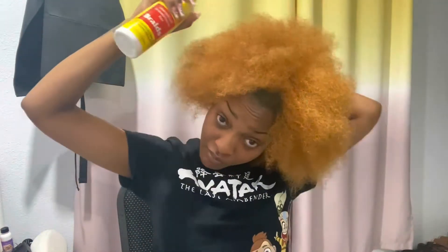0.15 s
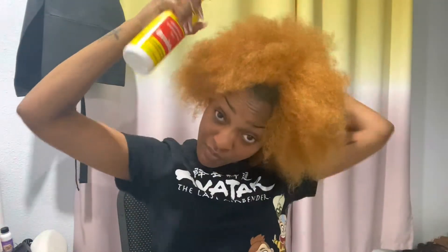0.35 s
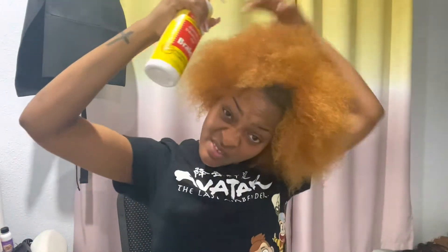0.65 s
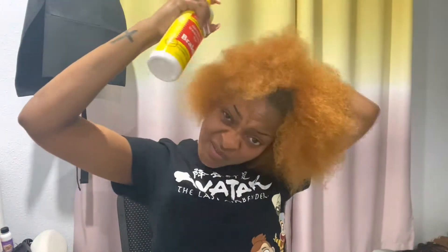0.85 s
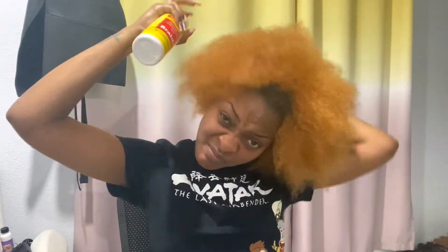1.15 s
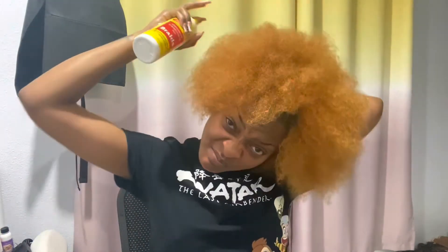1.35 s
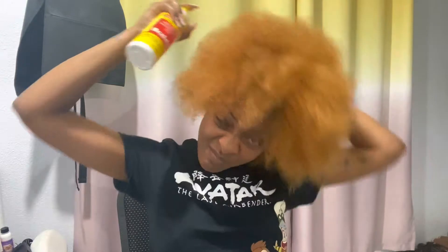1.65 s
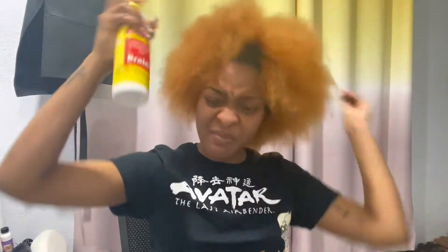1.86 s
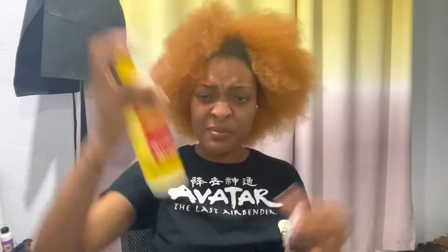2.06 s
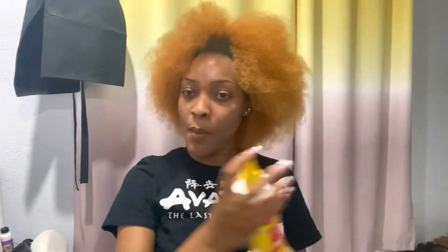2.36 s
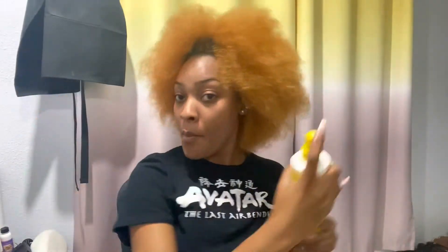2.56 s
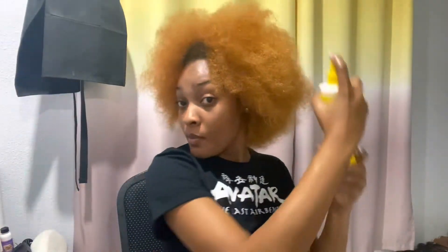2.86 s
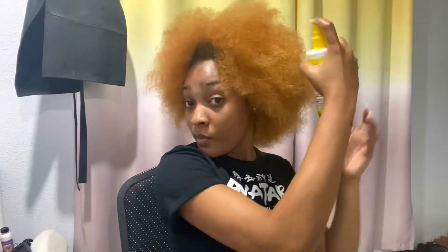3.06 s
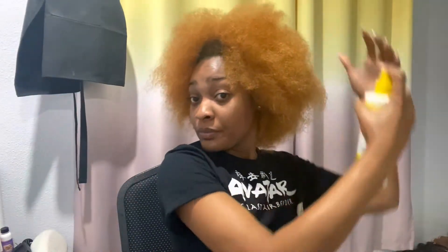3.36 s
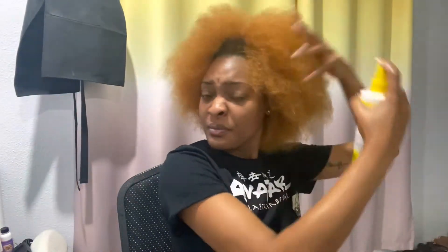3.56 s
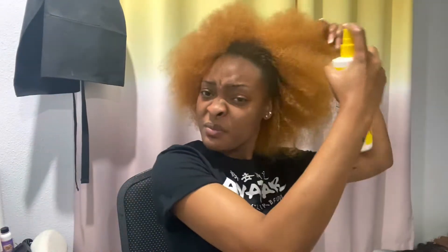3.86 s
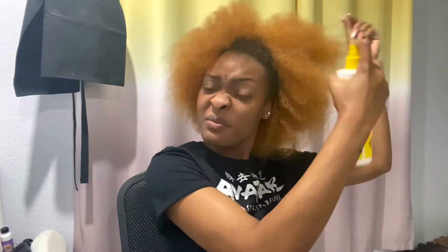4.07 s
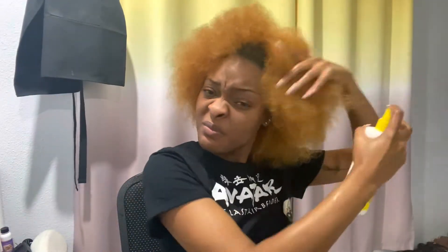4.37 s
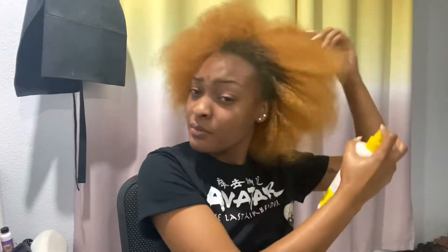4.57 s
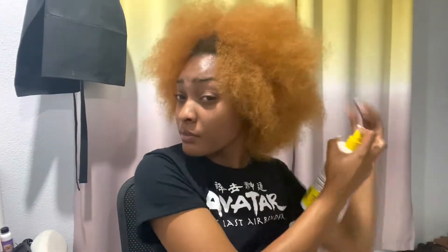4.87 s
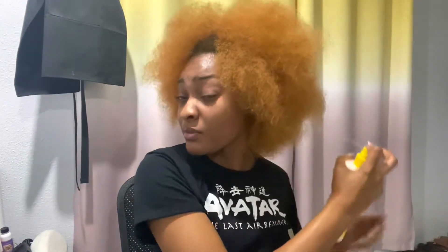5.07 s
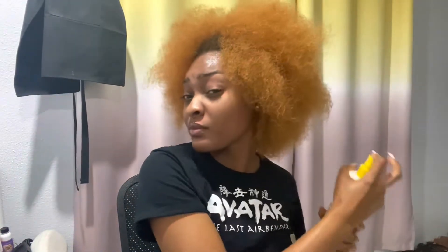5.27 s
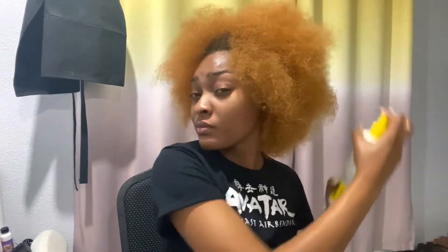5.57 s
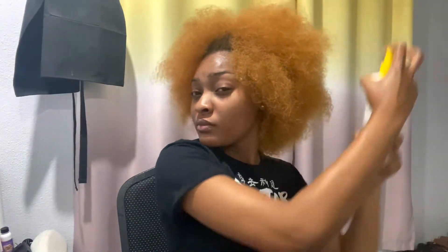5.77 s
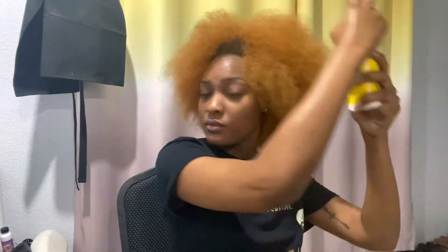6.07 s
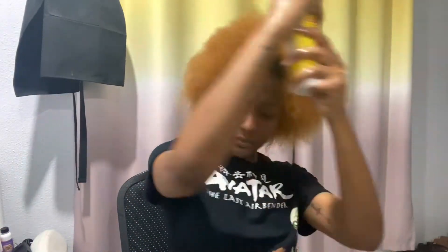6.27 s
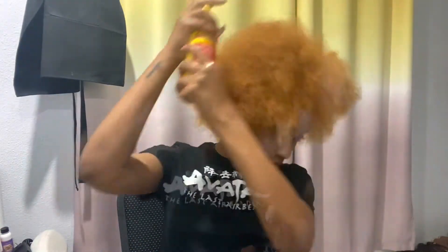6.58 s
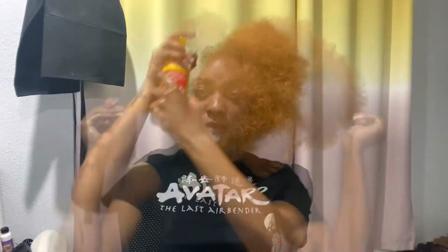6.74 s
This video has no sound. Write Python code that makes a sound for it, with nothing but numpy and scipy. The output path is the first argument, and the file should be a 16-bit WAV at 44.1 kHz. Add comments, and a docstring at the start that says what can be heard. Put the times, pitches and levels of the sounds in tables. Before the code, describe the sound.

Close in a small, bare, lightly echoing room, a plastic finger-pump bottle puffs short bright mists onto hair, about three and a half a second. After six or seven it stops while hands rub and tap the plastic, then resumes evenly with much harder clacks at the end of each press. Low hum and rumble rise underneath in the second half. The stereo microphone hears it mostly on the left.

```python
"""Finger-pump mist bottle

A plastic bottle mists hair, three to four squirts a second, in a small bare room; midway it changes hands.
Presses are shaped noise ending in a clack: blows ringing plastic resonances over a low sine knock.
Taps, rubs and bumps of the hands are struck resonances and coloured noise. Mostly on the left.
Mains hum (sines) and low rumble (noise) come up in the second half, under faint room hiss."""
import sys
import numpy as np
from scipy import signal
from scipy.fft import rfft, irfft
from scipy.io import wavfile

SR = 44100
rng = np.random.default_rng(int(sys.argv[2]) if len(sys.argv) > 2 else 0)


def transcribe(signal):
    """Save signal, clipped to [-1, 1], as a 16-bit WAV file at the path in sys.argv[1]."""
    frames = np.atleast_2d(signal).T
    limited = np.clip(frames, -1, 1)
    pcm = np.round(limited * 32767).astype(np.int16)
    wavfile.write(sys.argv[1], SR, pcm)


N = 304731
TIME_S = np.arange(N) / SR
HZ = np.fft.rfftfreq(4096, 1 / SR)

# All table levels are relative.
# Pump presses: (start [s], mist level [dB])
PRESSES = [(-.03, -49.5), (0.266, -52), (0.545, -46.5), (.821, -46), (1.105, -48), (1.397, -47),
           (1.695, -46), (3.035, -46), (3.318, -46), (3.601, -46.5), (3.874, -46), (4.146, -47),
           (4.417, -45), (4.688, -46), (4.969, -46.5), (5.264, -48.5), (5.567, -47.5), (5.835, -46.5),
           (6.13, -48), (6.441, -49.5), (6.723, -53)]
# Nozzle hiss spectrum: (frequency [Hz], level [dB])
MIST_SPECTRUM = [(300, -56), (800, -8.5), (1500, -5.5), (2300, -3), (3000, -1.5), (4200, -0.5), (5200, -2),
                 (6500, 0.5), (7500, 0.5), (8400, -4), (9200, -9.5), (10200, -21), (10800, -35.5),
                 (13000, -102)]
# Nozzle turning away round the head: (time [s], brightness [dB/octave])
NOZZLE_AIM = [(0, 3), (3.1, 1.8), (4.1, 0.9), (6.9, 0.5)]
# Plunger stops: (time [s], level [dB], body knock [Hz], cap pitch [Hz], cap ring [dB])
PLUNGER_STOPS = [(0.0977, -37, 1020, 3870, 16.5), (0.3668, -52.5, 935, 3900, 8),
                 (0.9285, -51, 930, 3960, 1), (1.517, -31, 980, 3020, -8), (1.8077, -27.3, 880, 4240, 12.5),
                 (3.1604, -32.5, 890, 4070, 9), (3.7133, -22.5, 1300, 4800, 9.5),
                 (4.0025, -23.5, 750, 4300, 10), (4.2598, -25, 734, 4370, 14),
                 (4.8144, -19.5, 1015, 4040, 4), (5.078, -19.5, 1220, 3230, 3),
                 (5.383, -20.5, 700, 3600, 3.5), (5.661, -23.5, 837, 3250, 8), (5.9527, -20, 840, 4450, 4),
                 (6.2484, -22, 873, 4100, 9), (6.5408, -20, 850, 3760, 3.5), (6.8538, -30, 880, 4000, 9)]
# Bare plastic click spectrum: (frequency [Hz], level [dB])
PLASTIC_SPECTRUM = [(200, -13.5), (500, -5), (1400, 5.5), (2200, -13.5), (3200, 3.5), (5000, 1), (5800, -5),
                    (6500, -3), (7400, -12), (8600, -11), (9400, -21), (10200, -21), (11000, -78),
                    (13000, -54)]
# Shell resonance, tuned and damped by the sliding grip: (time [s], pitch [Hz], ring [dB])
SHELL_RING = [(0, 2220, 15.5), (1.5, 2150, 6), (3.1, 2320, 17.5), (3.7, 2130, 8.5), (5.4, 2110, 7.5),
              (6, 1820, 12), (6.9, 1980, 12)]
# Finger and nail taps on the bottle: (time [s], level [dB], pitch [Hz])
FINGER_TAPS = [(1.77, -37, 1840), (2.157, -34.5, 3850), (2.188, -41, 1650), (2.251, -29, 2720),
               (2.313, -51, 2870), (2.572, -43.5, 5000), (2.685, -41, 1210), (2.863, -37.5, 1300),
               (5.246, -36, 601), (5.549, -30.5, 2330), (6.4235, -27, 2390)]
# Palm and fingers sliding and squeaking: (start [s], length [s], level [dB], pitch [Hz], ring [dB])
HAND_RUBS = [(0.328, 0.047, -57.5, 1730, 23), (1.197, 0.079, -60, 2280, 17),
             (2.145, 0.13, -55.5, 1820, 11.5), (2.59, 0.11, -67, 2340, 18), (2.661, 0.27, -68, 2830, 26),
             (2.85, 0.1, -65.5, 5050, 18), (2.857, 0.069, -55, 1530, 9), (5.542, .052, -47, 2350, 8.5),
             (6.418, .047, -41.5, 2370, 17)]
# Dull hand bumps about the start of a press: (time [s], level [dB])
HAND_BUMPS = [(4.167, -40), (5.575, -38), (5.836, -42), (6.099, -40.5), (6.43, -37.5)]
# Mains hum partials: (frequency [Hz], level [dB], phase between channels [rad])
HUM_PARTIALS = [(58.6, -0.5, 1.54), (121, 2.5, 2.21)]
# Rumble spectrum: (frequency [Hz], level [dB])
RUMBLE_SPECTRUM = [(22, -42), (42, -4), (60, 1.5), (95, -1.5), (160, -4.5), (280, -4.5), (420, -12.5),
                   (800, -23), (2000, -82)]
# Swell of hum and rumble: (time [s], level [dB])
LOW_SWELL_DB = [(0, -22.5), (1.5, -16.5), (2.7, -16), (4.1, -9), (4.55, 0.5), (5.8, 0), (6.9, -3)]
# Room hiss spectrum: (frequency [Hz], level [dB])
AIR_SPECTRUM = [(200, -24), (600, -1.5), (1500, 3.5), (2300, 7), (3200, -1), (5000, 0.5), (8000, -2),
                (10000, -15.5), (11500, -15), (13500, -25)]
# Room hiss level: (time [s], level [dB])
AIR_LEVEL_DB = [(0, -63), (2.6, -68.5), (3.6, -62.5), (6.3, -64.5), (6.9, -72)]
# Reverberation time: (frequency [Hz], t60 [s])
ROOM_T60 = [(200, 0.89), (600, 0.58), (1400, 0.54), (2400, 0.51), (4200, 0.53), (8000, 0.39), (12000, 0.44)]
# Reverberation colour: (frequency [Hz], level [dB])
TAIL_COLOUR = [(300, 2), (800, -3.5), (1400, -2.5), (2300, 3), (4200, 1), (8000, 1)]
# Wall and ceiling echoes: (delay [s], level [dB])
WALL_ECHOES = [(.0125, -15.5), (0.0205, -24.5), (.0255, -18), (.031, -12), (0.037, -22)]
# Bottle travelling round the head: (time [s], right over left [dB])
BOTTLE_SWING = [(0, 7), (.6, 4.5), (1.5, 1), (3, 0), (4.1, 0), (6.9, 0)]
# Right channel response: (frequency [Hz], gain [dB])
RIGHT_RESPONSE = [(40, 0.5), (120, -9.5), (250, -2.5), (600, -0.5), (1200, -6.5), (2300, -9), (3400, -9),
                  (4600, -15), (6500, -8.5), (7600, -7.5), (8600, -18), (10000, -5)]

STROKE_MAX_S, SHORT_STROKE_S = 0.15, 0.084  # latest stop of a full press; jet length without a stop
OVERRUN_S, OPENING_DB = 0.0077, -8  # jet outlasts the stop; opening level against full flow
REBOUND_S, REBOUND_SPREAD_S, REBOUND_DB = 0.0065, 0.0008, -11.5
THUD_DB, THUD_GROWTH = -20, 0.34  # knock for a 0 dB blow; dB of knock per dB of blow
TAP_RING_DB, RUB_WIDTH_HZ, BUMP_HZ = 22.5, 156, 293
HUM_DB, RUMBLE_DB = -52.5, -51.5
RUMBLE_FOLLOWS = 0.79  # dB per dB of the low swell
AIR_RIGHT_DB = 5.5  # ahead of the right channel response
EDGE_HZ = 13760


def amp(db):
    """Decibels to gain."""
    return 10 ** (np.asarray(db) / 20)


def unit(x):
    """Scale to rms 1."""
    return x / np.sqrt(np.mean(x ** 2) + 1e-20)


def read(points, hz):
    """Interpolate a spectrum along a log-frequency axis."""
    point_hz, value = np.transpose(points)
    return np.interp(np.log(hz + 1), np.log(point_hz + 1), value)


def track(points, time_s):
    """Interpolate a two-column table in time."""
    return np.interp(time_s, *np.transpose(points))


def add(mix, time_s, sound):
    """Mix a sound in at a time, trimming both ends to fit."""
    start = round(time_s * SR)
    sound = sound[max(-start, 0):]
    part = mix[max(start, 0):][:len(sound)]
    part += sound[:len(part)]


def causal(db):
    """Minimum-phase impulse response of a dB curve on HZ."""
    mirrored_db = np.concatenate([db, db[-2:0:-1]])
    log_spectrum = np.conj(signal.hilbert(np.log(amp(mirrored_db))))
    return np.fft.ifft(np.exp(log_spectrum)).real[:len(HZ)]


def noise(db, size):
    """Gaussian noise of rms 1 with a dB curve on HZ."""
    colour = np.interp(np.fft.rfftfreq(size, 1 / SR), HZ, amp(db))
    white = rng.standard_normal(size)
    return unit(irfft(rfft(white) * colour, size))


def noise_pair(spectrum, likeness):
    """Two channels of noise with a given correlation."""
    left = noise(read(spectrum, HZ), N)
    other = noise(read(spectrum, HZ), N)
    return np.array([left, likeness * left + np.sqrt(1 - likeness ** 2) * other])


def wander(knots_per_s, size):
    """Random drift: standard normal knots joined by straight lines."""
    knots = rng.standard_normal(4096)
    return np.interp(np.arange(size) / SR * knots_per_s, np.arange(len(knots)), knots)


def background(hum_waver_db=1.5, rumble_waver_db=3.4, air_waver_db=0.7, drift_rad=0.92):
    """Wavering mains hum and lumpy rumble on one swell, under faint room air."""
    swell_db = track(LOW_SWELL_DB, TIME_S)
    rumble_db = RUMBLE_DB + RUMBLE_FOLLOWS * swell_db + rumble_waver_db * wander(21, N)
    out = amp(rumble_db) * noise_pair(RUMBLE_SPECTRUM, likeness=-0.59)

    air_db = track(AIR_LEVEL_DB, TIME_S) + air_waver_db * wander(20, N)
    channel_gain = amp([[0], [AIR_RIGHT_DB]])
    out += amp(air_db) * channel_gain * noise_pair(AIR_SPECTRUM, likeness=0.05)

    for hz, db, apart_rad in HUM_PARTIALS:
        phase = 2 * np.pi * hz * TIME_S + drift_rad * wander(4.3, N)
        level_db = HUM_DB + swell_db + db + hum_waver_db * wander(16, N)
        out += amp(level_db) * np.sin([phase, phase + apart_rad])
    return out


def jet_length_s(start):
    """Time from a press to just past its stop, or a short stroke if no stop follows soon."""
    for stop, *_ in PLUNGER_STOPS:
        if 0 < stop - start < STROKE_MAX_S:
            return stop - start + OVERRUN_S
    return SHORT_STROKE_S


def squirts(level_db, rise_s=0.015, fall_s=0.0046, sputter_db=1.3):
    """The jet starts abruptly, swells with finger pressure and sputters until the plunger stops."""
    out = np.zeros(N)
    t = np.arange(SR // 4) / SR
    whistle = 2.5 / (1 + ((HZ - 8350) / 300) ** 2)  # octaves' worth of tilt, at 8350 Hz
    octaves = np.log2((HZ + 100) / 5000)
    for start, db in PRESSES:
        pressure = (1 - np.exp(-t / 0.003)) * amp(OPENING_DB * np.exp(-t / rise_s))
        pressure *= np.exp(-np.maximum(t - jet_length_s(start), 0) / fall_s)
        # aimed at the microphone: brighter, with more whistle
        tilt = track(NOZZLE_AIM, start)
        hiss = noise(read(MIST_SPECTRUM, HZ) + tilt * (octaves + whistle), len(t))
        sputter = sputter_db * wander(495.6, len(t))
        add(out, start, amp(db + level_db + sputter) * pressure * hiss)
    return out


def bottle_db(modes):
    """Plastic click spectrum plus damped resonances (frequency [Hz], width [Hz], level [dB])."""
    power = amp(read(PLASTIC_SPECTRUM, HZ)) ** 2
    for hz, width_hz, db in modes:
        offset = (HZ - hz) / width_hz
        peak = amp(db) / (1 + offset ** 2) / (1 + (offset / 4) ** 2)
        power = power + peak ** 2
    return 10 * np.log10(power)


def contact(scrape, decay_s, even=0.2):
    """Force of a blow, energy 1: a spike and brief plastic chatter, spectrum partly evened out."""
    t = np.arange(1024) / SR
    chatter = rng.standard_normal(len(t)) * np.exp(-t / decay_s)
    force = scrape * chatter / np.linalg.norm(chatter)
    force[0] += 1
    spectrum = rfft(force, 2 * len(t))
    force = irfft(spectrum / abs(spectrum) ** even)[:len(t)]
    return force / np.linalg.norm(force)


def clacks(level_db, shell_width_hz=600, cap_width_hz=800, pair_ratio=0.94, pair_db=-4):
    """The plunger hits its stop and bounces once, ringing the shell and a close mode pair in the cap."""
    out = np.zeros(N)
    grip_s, shell_hz, shell_db = np.transpose(SHELL_RING)
    for time_s, db, _, cap_hz, cap_db in PLUNGER_STOPS:
        shell_pitch_hz = np.interp(time_s, grip_s, shell_hz)
        shell_ring_db = np.interp(time_s, grip_s, shell_db)
        modes = [(shell_pitch_hz, shell_width_hz, shell_ring_db),
                 (cap_hz, cap_width_hz, cap_db),
                 (cap_hz * pair_ratio, cap_width_hz, cap_db + pair_db)]
        ring = amp(db + level_db) * causal(bottle_db(modes))
        blow = contact(scrape=1.35, decay_s=0.005)
        rattle = contact(scrape=1.6, decay_s=0.003)
        rebound_s = time_s + REBOUND_S + REBOUND_SPREAD_S * rng.standard_normal()
        add(out, time_s, signal.fftconvolve(blow, ring))
        add(out, rebound_s, amp(REBOUND_DB) * signal.fftconvolve(rattle, ring))
    return out


def thuds(swell_s=0.00088, rebound_db=-13):
    """The same blows shake the liquid-filled body: a few cycles of a low, woody knock."""
    out = np.zeros(N)
    t = np.arange(1024) / SR
    envelope = t / swell_s * np.exp(1 - t / swell_s)  # peaks at swell_s
    for time_s, db, knock_hz, *_ in PLUNGER_STOPS:
        knock = amp(THUD_DB + THUD_GROWTH * db) * envelope * np.sin(2 * np.pi * knock_hz * t)
        add(out, time_s - swell_s, knock)
        add(out, time_s + REBOUND_S, amp(rebound_db) * knock)
    return out


def handling(tap_db=4, tap_width_hz=600, grain_db=4):
    """Hands on the bottle: taps ring one resonance, sliding is grainy friction noise around another."""
    out = np.zeros(N)
    for time_s, db, hz in FINGER_TAPS:
        ring = causal(bottle_db([(hz, tap_width_hz, TAP_RING_DB)]))
        touch = contact(scrape=0.35, decay_s=0.003)
        add(out, time_s, amp(db + tap_db) * signal.fftconvolve(touch, ring))

    t = np.arange(SR // 4) / SR
    for start, length_s, db, hz, ring_db in HAND_RUBS:
        stroke = (1 - np.exp(-t / 0.0011)) * np.exp(-np.maximum(t - length_s, 0) / 0.019)
        friction = noise(bottle_db([(hz, RUB_WIDTH_HZ, ring_db)]), len(t))
        grain = grain_db * wander(348.6, len(t))
        add(out, start, stroke * amp(db + grain) * friction)
    return out


def bumps(level_db=-2, width_hz=55):
    """Soft low pushes of the hand: narrow noise bursts, opposite in sign between channels."""
    out = np.zeros(N)
    t = np.arange(SR // 4) / SR
    middle_s = t.mean()
    push = np.exp(-((t - middle_s) / 0.03) ** 2)
    spectrum_db = -20 * np.log10(1 + ((HZ - BUMP_HZ) / width_hz) ** 2)
    for time_s, db in HAND_BUMPS:
        add(out, time_s - middle_s, amp(db + level_db) * push * noise(spectrum_db, len(t)))
    return np.array([out, -0.6 * out])


def room_tail(build_s=0.012):
    """Sparse reflections of random sign that build up, then die band by band."""
    reflections = rng.choice([-1., 1.], SR) * (rng.random(SR) < 4000 / SR)  # about 4000 a second
    hz, t, bands = signal.stft(reflections, SR, nperseg=256)
    fade_db = read(TAIL_COLOUR, hz)[:, None] - 60 * t / read(ROOM_T60, hz)[:, None]
    tail = signal.istft(bands * amp(fade_db), SR, nperseg=256)[1][:SR]
    tail *= 1 - np.exp(-(np.arange(SR) / SR / build_s) ** 2)
    return tail / np.linalg.norm(tail)


def in_room(x, wet_db, echo_db, right_direct_db, places=6):
    """Direct sound, first echoes and a tail that changes as the bottle moves about."""
    early = np.zeros((2, SR // 10))
    for side in early:
        for delay_s, db in WALL_ECHOES:
            add(side, delay_s + rng.uniform(-0.0004, 0.00056), amp([db + echo_db]))
    early[0, 0] += 1  # direct sound, left
    out = signal.oaconvolve(x[None], early, axes=1)[:, :N]
    out[1] += amp(right_direct_db) * np.roll(x, -21)  # right leads by 21 samples

    # cycle through the places, three a second, with equal-power crossfades
    for k in range(places):
        away = abs((TIME_S * 3 + k) % places - places / 2)
        place_gain = np.sqrt(np.maximum(1 - away, 0))
        tails = np.array([room_tail(), room_tail()])
        out += amp(wet_db) * signal.oaconvolve((x * place_gain)[None], tails, axes=1)[:, :N]
    return out


def scene():
    """Mist, plunger and hands move round the head in the room, over the background."""
    mist = in_room(squirts(level_db=1.0), wet_db=0, echo_db=-0.5, right_direct_db=-4.5)
    pump = in_room(clacks(level_db=19.5), wet_db=0.5, echo_db=-4.5, right_direct_db=-7)
    body = in_room(thuds(), wet_db=-3.0, echo_db=-2, right_direct_db=-6.5)
    fingers = in_room(handling(), wet_db=-4, echo_db=-3, right_direct_db=-4)
    swing_db = track(BOTTLE_SWING, TIME_S)
    pan = amp(np.outer([-0.25, 0.75], swing_db))  # left falls a little, right rises
    return pan * (mist + pump + body + fingers) + bumps() + background()


def record(dry):
    """Weaken and dull the right channel, then band-limit both."""
    right = signal.oaconvolve(dry[1], causal(read(RIGHT_RESPONSE, HZ)))[:N]
    lowpass = signal.firwin(255, EDGE_HZ, window=("kaiser", 8), fs=SR)
    return signal.oaconvolve(np.array([dry[0], right]), lowpass[None], "same", axes=1)


dry = scene()
out = record(dry)
transcribe(out)
```